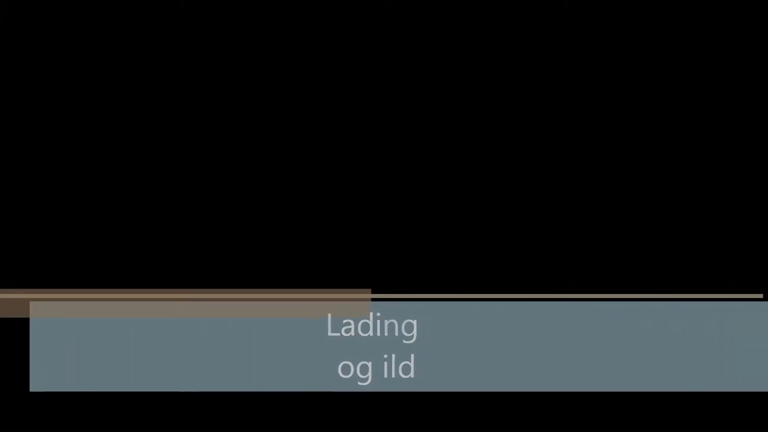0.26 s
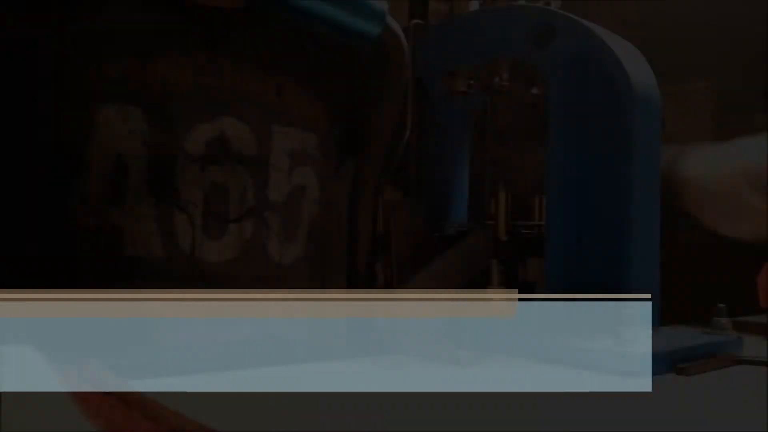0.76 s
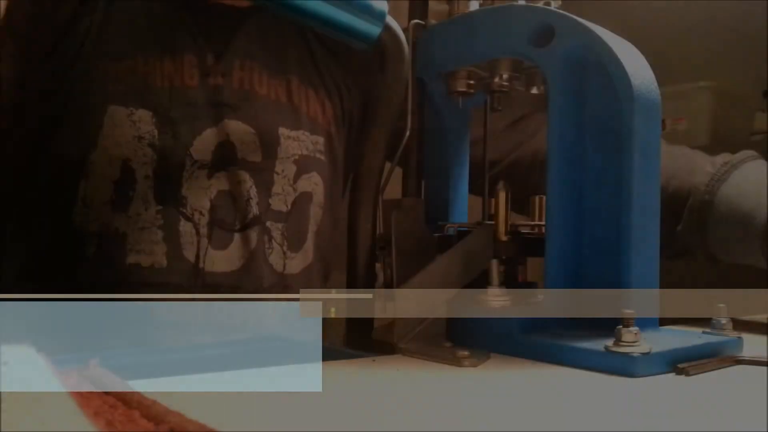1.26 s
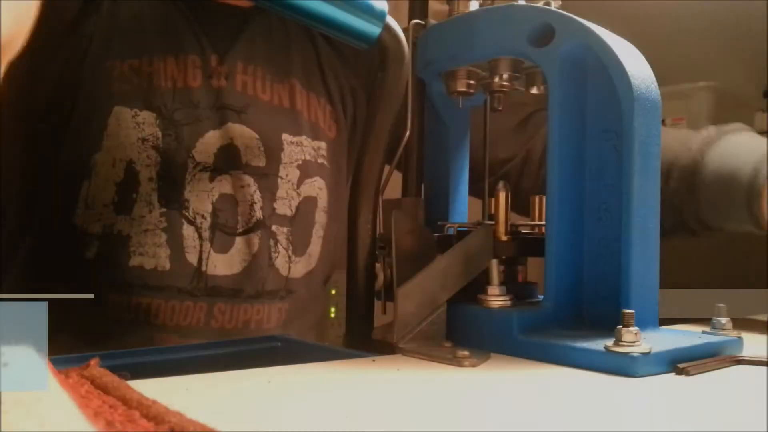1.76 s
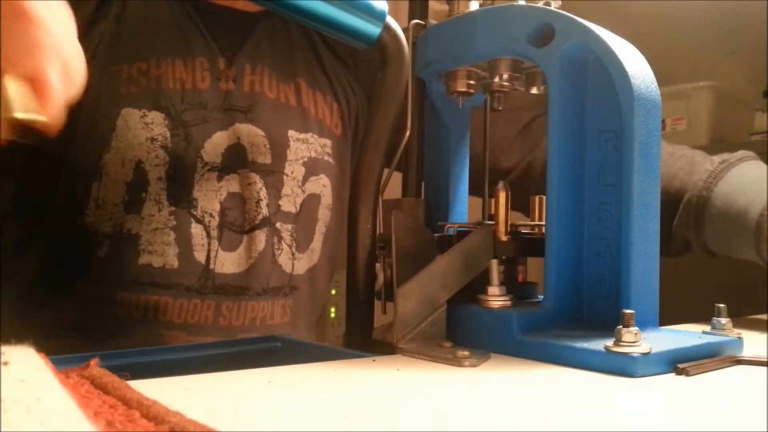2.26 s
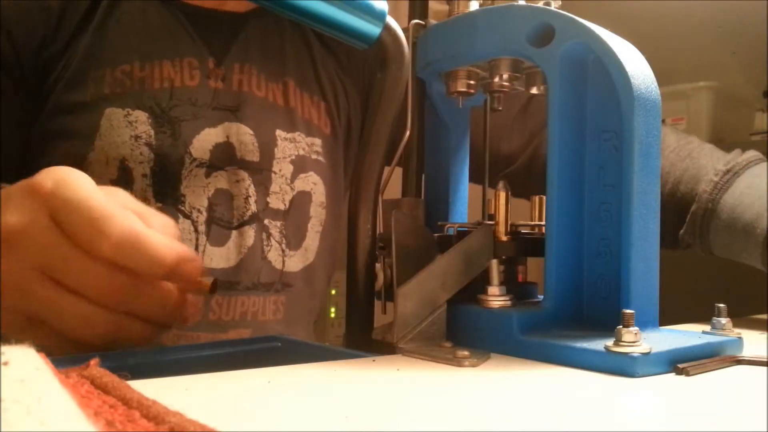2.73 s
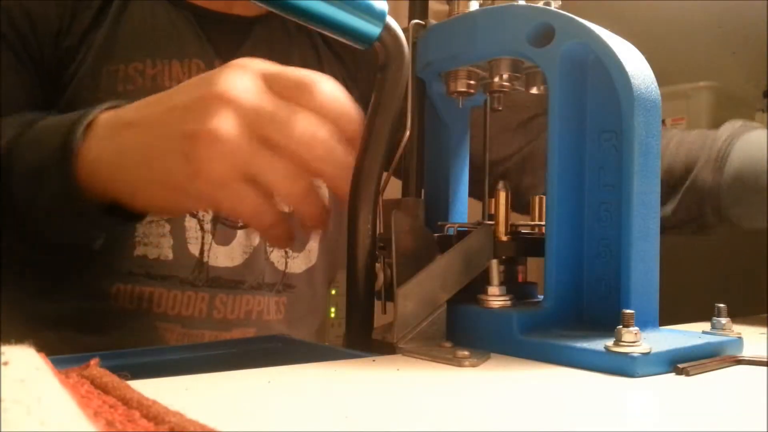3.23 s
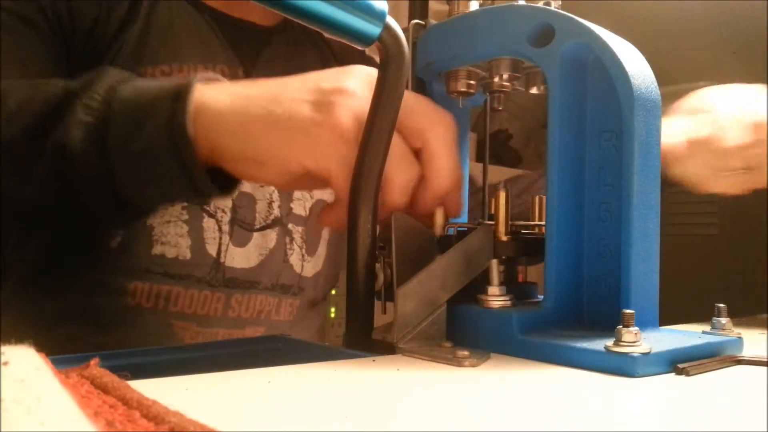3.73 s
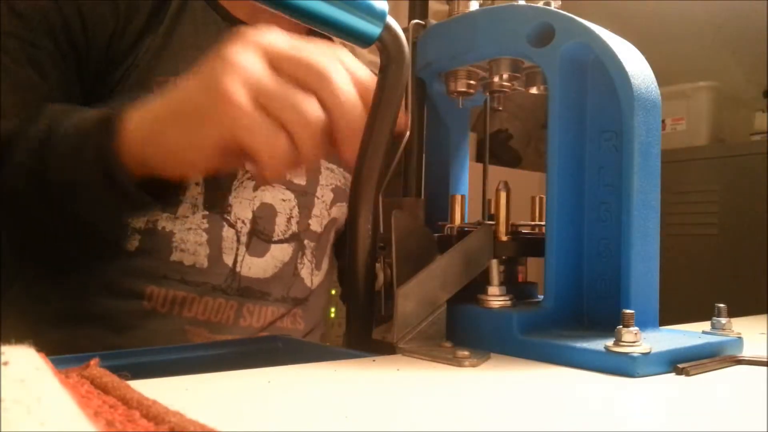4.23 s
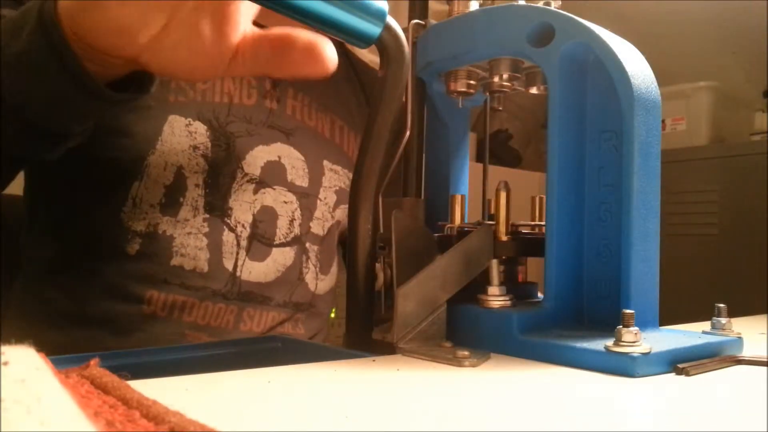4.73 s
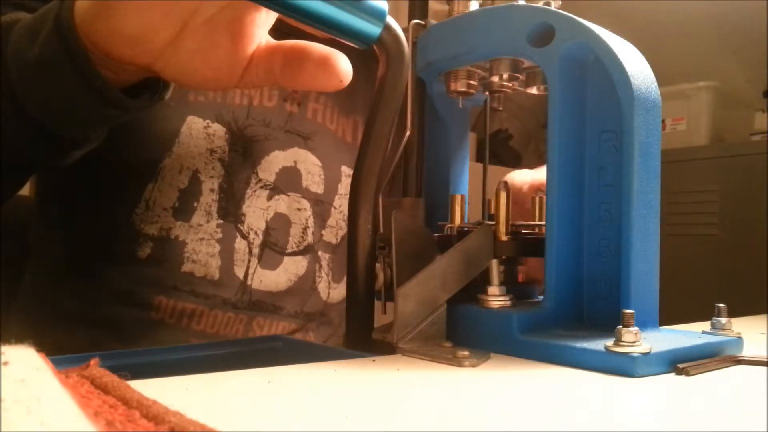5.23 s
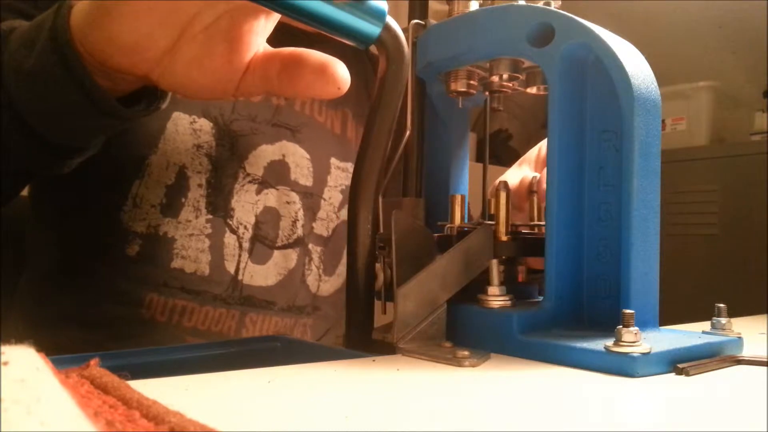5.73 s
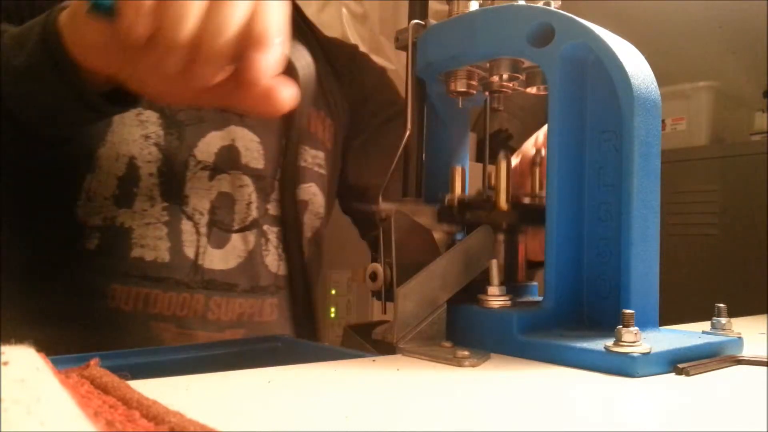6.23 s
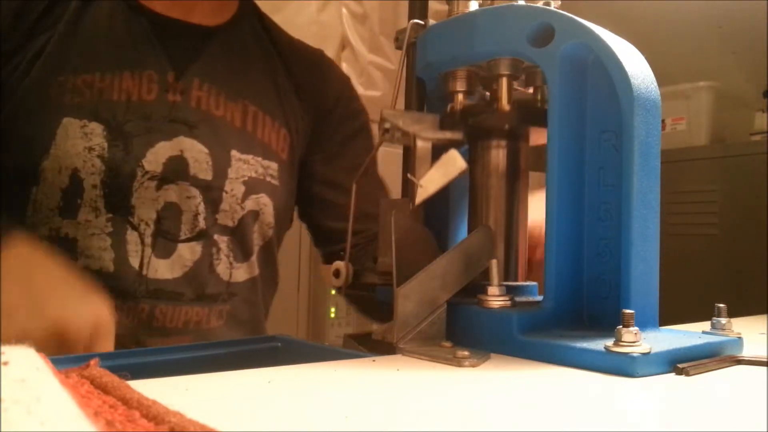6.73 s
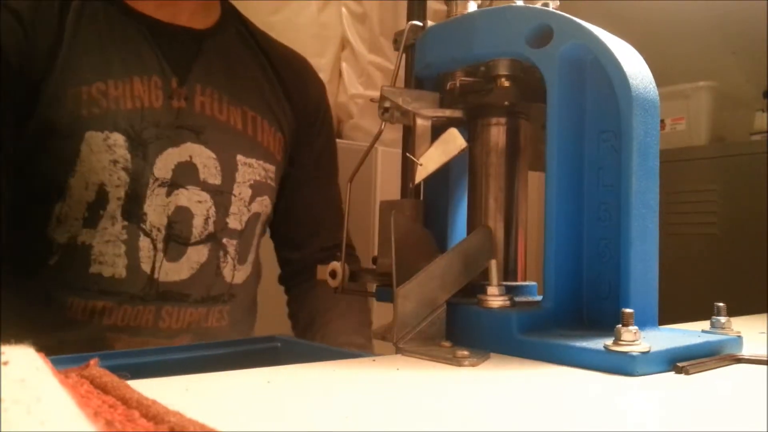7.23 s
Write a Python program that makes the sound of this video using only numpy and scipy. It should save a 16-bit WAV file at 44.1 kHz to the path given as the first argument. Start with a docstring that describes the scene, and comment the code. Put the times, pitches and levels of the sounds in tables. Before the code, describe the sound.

Close rummaging through small brass cases, a quieter spell of light clicks, then a quick run of loud steel clanks from a hand press.

```python
"""A reloading press on a wooden bench, close up in a small room, on a spaced pair of microphones.
A hand rummages through brass cases in a tray, sets one on the shell plate, then pulls the handle and
the steel linkage clanks. Each contact rings the metal with a noisy crack; cases jostle and scrape, the
tray thumps and the bench creaks. Mains hum and microphone hiss lie under it; the loudest blows clip."""
import sys
import numpy as np
from scipy import signal
from scipy.fft import rfft, irfft, next_fast_len
from scipy.io import wavfile
from scipy.ndimage import map_coordinates

SR = 44100
rng = np.random.default_rng(int(sys.argv[2]) if len(sys.argv) > 2 else 0)


def unload_wav(signal):
    """Save mono or channel-first audio to the path in sys.argv[1] as 16-bit WAV at rate SR, clipped to [-1, 1]."""
    wavfile.write(
        sys.argv[1],
        SR,
        np.round(np.clip(np.atleast_2d(signal).T, -1, 1) * 32767).astype(np.int16),
    )


N = 330088

# Noise colour of brass cases. Each row: frequency in Hz, spectral level in dB.
BRASS_COLOUR = [(35, -62), (60, 9), (192, -30), (236, -15), (359, -9), (433, -5), (673, -8), (829, -5.5),
                (1480, -4.5), (3580, -8.5), (5710, -24), (12600, -34), (15500, -48.5)]


def press_clanks():
    """The linkage knocks as the handle is pulled, ringing the steel frame."""
    # Linkage blows, with rows as in contacts().
    blows = [(4.739, -24.5, 970, -31, 3040, -16.5, 10900, 0.0064),
             (4.784, -21.5, 901, -26.5, 2640, -18.5, 10900, 0.0067),
             (5.27, -40.5, 856, -42, 2790, -21, 8650, 0.0061),
             (5.37, -46, 560, -37, 1850, -8, 7380, 0.0054), (5.578, -39, 855, -41, 2940, -10, 7980, 0.0067),
             (5.766, -38, 506, -53, 2380, -21, 6840, 0.0044),
             (5.99, -40.5, 533, -46, 2220, -22, 8720, 0.0056),
             (6.049, -36, 585, -42.5, 2700, -14.5, 7120, 0.0043),
             (6.098, -32, 470, -47, 3500, -23, 8620, 0.0074),
             (6.158, -37, 520, -47.5, 3140, -16, 6790, 0.0044),
             (6.319, -27.5, 529, -29, 2985, -10.5, 13400, 0.0047),
             (6.452, -41, 890, -36.5, 4230, -17, 13500, 0.0044),
             (6.475, -27, 583, -36, 2410, -31, 7250, 0.0034),
             (6.491, -32.5, 354, -35, 1990, -33, 8380, 0.0058),
             (6.651, -26.5, 482, -30, 1990, -6, 8060, 0.0044),
             (6.669, -13.5, 470, -15.5, 2070, -12, 8040, 0.0058),
             (6.684, -3, 607, -12, 1720, -35, 6540, 0.0032), (6.693, -3, 530, -5, 1700, -30, 6770, 0.0034),
             (6.778, -9, 543, -11.5, 3430, -9.5, 8400, 0.004),
             (6.838, -15.5, 476, -22, 1990, -3, 8400, 0.0041),
             (6.862, -9, 254, -19.5, 2910, -10.5, 8100, 0.0043),
             (6.9, 0, 496, -16, 1960, -21.5, 8220, 0.0045),
             (6.946, -5.5, 515, -38, 1724, -33, 6810, 0.0034),
             (6.974, -20, 497, -23.5, 3820, -4.5, 14000, 0.0079),
             (7.015, -9.5, 563, -21.5, 1770, -17.5, 9900, 0.0048),
             (7.053, -34, 500, -37, 4360, 5, 13700, 0.0029),
             (7.09, -25.5, 354, -36, 4300, -5.5, 13400, 0.0026),
             (7.102, -18, 357, -29.5, 3810, -27, 6610, 0.005),
             (7.219, -4.5, 474, -12, 2130, -36, 6340, 0.0025),
             (7.231, -9, 531, -11, 1780, -13.5, 7400, 0.0071),
             (7.244, -26, 433, -11, 1810, -3, 6500, 0.006),
             (7.261, -19, 323, -13, 2000, -6.5, 6930, 0.0035),
             (7.298, -14, 545, -30, 2480, -28, 6940, 0.0034),
             (7.316, -25, 545, -34, 2100, -28, 7070, 0.0055),
             (7.429, -24.5, 254, -43.5, 2520, -33, 6910, 0.0028)]
    # Modes of the frame and noise colour of the steel. Each row: frequency in Hz, level in dB.
    frame_modes = [(240, -4), (355, -15), (518, -12.5), (600, 1), (930, -7), (1800, 41), (2400, -9),
                   (3110, -38), (3565, -6), (4720, 13)]
    steel_colour = [(35, -56), (60, -8), (183, -22.5), (231, -15), (376, -13), (509, 9), (657, -3.5),
                    (953, -4.5), (1350, -16), (1830, -19.5), (2710, -31.5), (13800, -40.5), (15500, -40)]
    return contacts(blows, frame_modes, steel_colour, lead_s=0.00038, shake_db=-6, bass_hz=94, pan_db=-1)


def case_clinks():
    """Brass cases knock against each other and the tray."""
    # Case hits, with rows as in contacts().
    hits = [(0.562, -23, 603, -27.5, 2400, -15, 13000, 0.0021),
            (0.824, -40, 443, -44, 1620, -26, 10200, 0.0048),
            (0.918, -18.5, 754, -31.5, 2570, -20, 6060, 0.0037),
            (0.943, -21.5, 550, -42, 2120, -27, 8720, 0.0053),
            (0.993, -20, 730, -33, 2250, -27, 6400, 0.005),
            (1.017, -20.5, 423, -29.5, 3450, -15.5, 9370, 0.0049),
            (1.08, -7, 549, -20.5, 2130, -28, 6870, 0.004),
            (1.101, -4, 479, -11.5, 3210, -18, 7460, 0.0029),
            (1.12, -4.5, 552, -16, 2220, -26, 6150, 0.0067),
            (1.138, -10, 1110, -18, 2180, -29, 8210, 0.0075),
            (1.148, -0.5, 611, -11, 1640, -31, 7830, 0.0034),
            (1.172, -9.5, 556, -13, 1946, -20, 6840, 0.0076),
            (1.188, -6.5, 1007, -6.5, 1950, -15, 7290, 0.0025),
            (1.218, -12, 1150, -14, 1660, -15, 6440, 0.0046), (1.25, -7, 584, -15, 1570, -23, 5960, 0.004),
            (1.287, -14.5, 530, -22, 1680, -25, 6280, 0.0098),
            (1.345, -9, 783, -21, 1820, -23, 6820, 0.008), (1.367, -9, 520, -13.5, 1640, -22, 6330, 0.0033),
            (1.38, -13.5, 610, -19.5, 1795, -16.5, 5900, 0.0072),
            (1.419, -18.5, 674, -21, 1700, -13, 6700, 0.0048),
            (1.603, -9, 596, -11.5, 1980, -20.5, 7800, 0.0028),
            (1.682, -12, 527, -16.5, 2730, -20, 7600, 0.0017),
            (1.782, -8, 977, -13.5, 2440, -15, 7920, 0.0044),
            (1.806, -8.5, 553, -16.5, 2430, -18, 7100, 0.0043),
            (1.845, -5, 870, -8.5, 2430, -15, 5940, 0.0034),
            (1.871, -6.5, 910, -16, 3250, -10.5, 5860, 0.0039),
            (1.905, -13.5, 835, -20, 1660, -22, 6930, 0.0047),
            (1.96, -4, 800, -12, 2550, -18, 7030, 0.0027), (1.993, -12, 803, -23, 3600, -23, 6090, 0.0047),
            (2.017, -7.5, 772, -18.5, 3210, -20.5, 7780, 0.0035),
            (2.104, -2.5, 790, -7.5, 1710, -18, 7320, 0.0028),
            (2.143, -12.5, 770, -21.5, 3630, -19, 8200, 0.0045),
            (2.208, -0.5, 794, -11.5, 3090, -23.5, 6640, 0.0046),
            (2.226, -6, 715, -17.5, 3150, -31, 6690, 0.004),
            (2.266, -10, 1240, -19, 2420, -19, 5890, 0.0077),
            (2.284, -7, 1175, -12, 3490, -13, 6170, 0.0034),
            (2.357, -9.5, 462, -12.5, 2230, -22, 5940, 0.0038),
            (2.376, -10.5, 552, -37, 2130, -32, 6630, 0.006),
            (2.411, -18.5, 774, -25.5, 1890, -31, 7180, 0.0078),
            (2.435, -15.5, 500, -24, 2500, -18, 7930, 0.0049),
            (2.513, -9, 545, -17, 2260, -21, 7700, 0.0064),
            (2.524, -11, 433, -15.5, 1820, -19, 6710, 0.012),
            (2.564, -12.5, 1170, -17.5, 3290, -22, 7200, 0.0027),
            (2.59, -13, 515, -22.5, 1900, -12.5, 5800, 0.0029),
            (2.658, -19, 933, -24.5, 1550, -17, 8100, 0.012),
            (2.674, -8, 890, -14, 1710, -21.5, 6000, 0.0036),
            (2.689, -13.5, 519, -15, 1600, -13, 8000, 0.0039),
            (2.832, -15.5, 810, -19, 2460, -11.5, 7400, 0.0037),
            (2.927, -9.5, 476, -19.5, 3140, -18, 7800, 0.0032),
            (2.946, -4.5, 880, -18.5, 3270, -29, 5840, 0.0023),
            (2.978, -1, 434, -40, 1870, -40, 6260, 0.0023), (3.029, -1, 540, -34, 1650, -37, 6430, 0.0016),
            (3.041, -11, 476, -28, 3040, -33, 5920, 0.0043),
            (3.131, -2.5, 827, -15, 2240, -18, 5760, 0.0037),
            (3.198, -17.5, 560, -17, 1570, -13.5, 8370, 0.0048),
            (3.231, -22, 560, -26.5, 2250, -11.5, 10460, 0.0045),
            (3.285, -3, 867, -9, 1560, -12.5, 6700, 0.0048),
            (3.308, -18, 931, -16, 1580, -27, 8030, 0.0036), (3.323, -19, 890, -17, 2390, -22, 6500, 0.005),
            (3.343, -20, 960, -28, 1670, -29, 7580, 0.0058),
            (3.585, -25, 730, -21.5, 3600, 3, 9860, 0.0019),
            (3.691, -39.5, 610, -32.5, 2300, 3, 5900, 0.0037),
            (3.824, -20, 517, -17.5, 3000, 2.5, 5800, 0.006),
            (3.881, -29, 510, -33, 2860, -13, 5920, 0.0049),
            (4.051, -43, 619, -42, 2930, -1.5, 5870, 0.0059),
            (4.317, -38.5, 470, -43.5, 3700, -18, 8200, 0.0045)]
    # Modes of the tray and cases. Each row: frequency in Hz, level in dB.
    tray_modes = [(245, -10), (440, -7.5), (535, -1.5), (620, -5), (850, 6), (1015, -16), (1135, 7.5),
                  (1650, -25), (1950, -21), (2390, -6), (3020, -41), (3240, -2), (3500, -4), (4010, 2),
                  (4330, -23.5)]
    return contacts(hits, tray_modes, BRASS_COLOUR, lead_s=0.00028, shake_db=-12, bass_hz=186, pan_db=3.5)


def contacts(hits, modes, colour, lead_s, shake_db, bass_hz, pan_db):
    """Each hit rings every part with a noisy crack and reaches the left microphone first.
    Each row: start in seconds, knock level in dB and pitch in Hz, ping level in dB and pitch in Hz,
    tick level in dB against the knock and pitch in Hz, contact time in seconds."""
    # Parts that answer a hit. Each row: low and high edge in Hz, t60 in seconds, tonal share from 0 to 1.
    parts = [(98.5, 310, 0.056, 0.02), (179.6, 800, 0.046, 0.4), (660, 1646, 0.029, 0.47),
             (1545, 2500, 0.011, 0.13), (2650, 4700, 0.026, 0.13), (4830, 37000, 0.026, 0.05)]
    line_width, hold_cycles = 0.013, 1.14  # loose parts blur in pitch; low ones swing longer
    falloff_db_per_octave = 11  # a part answers less, the further it lies from the struck tone
    out, t = np.zeros((2, N + SR)), np.arange(SR // 10) / SR
    mode_hz, mode_db = np.transpose(modes)
    cracks = [band(rng.standard_normal(2 * SR), colour, lo, hi) for lo, hi, _, _ in parts]
    centre_hz = np.array([np.sqrt(lo * hi) for lo, hi, _, _ in parts])
    half_lead = round(lead_s * SR) // 2
    for start, knock_db, knock_hz, ping_db, ping_hz, tick_db, tick_hz, contact_s in hits:
        at, offsets, sound = round(start * SR), rng.integers(SR, size=2), 0
        pitch = mode_hz * np.exp(0.0405 * rng.standard_normal(len(modes)))  # never quite the same spot
        pitch = np.append(pitch, [knock_hz, ping_hz, tick_hz])
        strength = amp(np.append(mode_db + 2 * rng.standard_normal(len(modes)), [11, 7, 0]))
        polarity = np.append(rng.choice([-1, 1], len(modes)), [1, 1, 1])
        walk = np.cumsum(rng.standard_normal((len(pitch), len(t))), axis=1)
        drift = np.sqrt(2 * np.pi * line_width * pitch[:, None] / SR) * walk
        tones = (strength * polarity)[:, None] * np.sin(2 * np.pi * pitch[:, None] * t + drift)
        low_db = knock_db - falloff_db_per_octave * abs(np.log2(centre_hz[1:3] / knock_hz))
        high_db = ping_db - falloff_db_per_octave * abs(np.log2(centre_hz[3:5] / ping_hz))
        levels = [shake_db + low_db[0], *low_db, *high_db, knock_db + tick_db]  # first: the bench shakes
        lean_db = pan_db + 3 * rng.standard_normal()
        for (lo, hi, t60, tonal), level_db, crack in zip(parts, levels, cracks):
            ring = unit(tones[(pitch >= lo) & (pitch < hi)].sum(axis=0))
            beaming = lo / (lo + 500)  # short waves beam, so the sides differ more in the treble
            mid, side = (crack[i:i + len(t)] for i in offsets)
            noise = unit(mid + 1.16 * beaming * np.outer([1, -1], side))
            rise = 1 - np.exp(-t * lo)
            mix = np.sqrt(tonal) * ring + np.sqrt(1 - tonal) * rise * noise
            free_s = np.maximum(t - contact_s - hold_cycles / np.sqrt(lo * hi), 0)
            balance_db = beaming * lean_db * np.array([[0.5], [-0.5]])
            sound = sound + amp(level_db - 60 * free_s / t60 + balance_db) * mix
        out[0, at - half_lead:][:len(t)] += sound[0]
        out[1, at + half_lead:][:len(t)] += sound[1]
    return filtered(out[:, :N], lambda f: (1j * f / (bass_hz + 1j * f)) ** 3)  # small parts: little bass


def jostle(lead_s, spread_db):
    """Shifting brass makes thousands of tiny touches a second, part direct and part scattered."""
    # Rummaging, setting up, the stroke: a list each. Each row: time in seconds, rumble and rustle in dB.
    gestures = [
        [(0.58, -103, -125), (0.73, -54, -57.5), (0.95, -41.5, -45.5), (1.16, -20.5, -22.5), (1.26, -19, -22),
         (1.42, -33.5, -41.5), (1.65, -34.5, -46.5), (1.99, -26, -28), (2.46, -26, -35), (2.78, -43.5, -54),
         (2.92, -43, -58), (3.14, -26.5, -48), (3.22, -39, -54), (3.38, -35, -49), (3.5, -52, -54)],
        [(3.56, -49, -62), (3.64, -48.5, -56), (3.77, -54, -42.5), (3.87, -37.5, -41.5), (4.1, -62, -53),
         (4.51, -56, -63), (4.77, -73, -92), (4.91, -45.5, -59), (5.06, -58.5, -93), (5.32, -53, -51),
         (5.46, -62, -57), (5.7, -63, -65), (5.99, -55, -60), (6.14, -52, -56), (6.55, -45.5, -52)],
        [(6.62, -47, -52), (6.714, -21.5, -38), (6.832, -26, -31), (6.864, -30, -28), (6.92, -23.5, -28.5),
         (7.032, -27.5, -33), (7.154, -50, -51), (7.284, -31, -29), (7.356, -39, -46.5), (7.48, -45, -57)],
    ]
    times, *levels = np.concatenate(gestures).T
    rumble, rustle = (amp(np.interp(np.arange(N) / SR, times, db, left=-120)) for db in levels)
    fizz = amp(-9) * rustle
    clumps, out = amp(2.5 * wobble(60)), 0
    layers = [(rumble, 180, 970, 2000), (rustle, 1500, 5400, 3000), (fizz, 5500, 34000, 6000)]
    for gain, lo_hz, hi_hz, touches_per_s in layers:
        touches = (rng.random((3, N)) < touches_per_s / SR) * rng.standard_normal((3, N)) * clumps
        out = out + gain * band(touches, BRASS_COLOUR, lo_hz, hi_hz)
    direct = np.array([amp(-9.5) * out[0], amp(-15.5) * np.roll(out[0], round(lead_s * SR))])
    return direct + amp(spread_db) * diffuse(out[1:])


def bench_thumps():
    """The tray drops on the bench top and the wood booms."""
    # Each row: start in seconds, level in dB.
    drops = [(2.319, -40), (2.428, -25), (2.513, -41), (2.834, -45), (2.93, -33), (2.983, -24),
             (3.031, -19.5), (3.287, -43)]
    # Each row: frequency in Hz, level in dB, t60 in seconds.
    bench_modes = [(141.8, -32, 0.3), (252.6, -4, 0.15)]
    return struck(drops, bench_modes, rise_s=0.0088)


def case_tinks():
    """A single case is touched and rings free."""
    # Each row: start in seconds, level in dB.
    touches = [(4.0532, -34), (6.319, -27.5)]
    # Each row: frequency in Hz, level in dB, t60 in seconds.
    case_modes = [(3160, 5, 0.045), (5200, -6, 0.037), (11000, -10.5, 0.06), (13420, -11.5, .06)]
    return struck(touches, case_modes, rise_s=0.0002)


def struck(hits, modes, rise_s):
    """A few modes ring down after each hit, in a slightly new balance each time."""
    out, t = np.zeros(N), np.arange(SR // 4) / SR
    for start, db in hits:
        ring = sum(amp(level + rng.normal(0, 1.5) - 60 * t / t60) * np.sin(2 * np.pi * hz * t)
                   for hz, level, t60 in modes)
        out[round(start * SR):][:len(t)] += amp(db) * (1 - np.exp(-t / rise_s)) * ring
    return out


def scrapes():
    """A case, the shell plate or the ram slides: a band of rubbing noise swells and fades."""
    # Each row: start, peak and end in seconds, centre in Hz, half width in octaves, level in dB.
    strokes = [(0.558, 0.577, .74, 1280, 1.63, -37), (3.781, 3.83, 3.92, 11500, 0.62, -30),
               (3.785, 3.802, 3.85, 3830, 0.66, -30.5), (3.8, 3.856, 4.08, 4900, 0.23, -40.5),
               (4.8, 4.894, 5.15, 1400, 0.27, -50), (5.25, 5.276, 5.38, 2930, .4, -49),
               (5.378, 5.443, 5.54, 4200, .4, -54), (6.447, 6.454, 6.52, 3900, 0.2, -38),
               (6.764, 6.8, 7.06, 4540, .6, -30.5), (6.76, 6.89, 7.17, 11200, 0.79, -34),
               (7.08, 7.097, 7.16, 4000, 0.23, -34)]
    out = np.zeros((2, N))
    for start, peak, end, hz, octaves, db in strokes:
        span = np.arange(round(start * SR), round(end * SR))
        noise = rng.standard_normal((2, SR // 2))
        rub = filtered(noise, lambda f: np.exp(-(np.log2((f + 1) / hz) / octaves) ** 2))
        swell = np.interp(span / SR, [start, peak, end], [0, 1, 0]) ** 2
        out[:, span] += amp(db) * swell * unit(rub)[:, :len(span)]
    return diffuse(out * amp(2 * wobble(62)))


def creaks():
    """Weight shifts on the bench and lever; stick and slip at a wavering rate gives a faint groan."""
    # Each row: start, peak and end in seconds, first and last pitch in Hz, level in dB.
    groans = [(0.724, 0.835, 0.93, 232.8, 217, -43.5), (4.857, 4.964, 5.15, 302, 285, -48),
              (5.875, 6.016, 6.7, 276, 267, -52.5), (6.047, 6.133, 6.3, 332.4, 451, -49),
              (6.184, 6.23, 6.1, 1690, 1650, -52)]
    # Each row: multiple of the pitch, level in dB.
    harmonics = [(1, -5.5), (2, 0), (3, -7), (4, -25), (5, -13), (7, -18)]
    out, waver = np.zeros(N), wobble(60)
    for start, peak, end, first_hz, last_hz, db in groans:
        span = np.arange(round(start * SR), round(end * SR))
        slip_hz = np.linspace(first_hz, last_hz, len(span)) * (1 + 0.0171 * waver[span])
        cycles = np.cumsum(slip_hz) / SR
        tone = sum(amp(level) * np.sin(2 * np.pi * k * cycles) for k, level in harmonics)
        swell = np.interp(span / SR, [start, peak, end], [0, 1, 0])
        out[span] += amp(db + 2 * waver[span[::-1]]) * swell * tone
    return out


def room(x):
    """The small room's short tail; hands and objects move, so the echo pattern keeps changing."""
    # Each row: frequency in Hz, t60 in seconds.
    decay_times = [(150, 0.47), (400, 0.17), (1000, 0.21), (2800, 0.22), (7000, 0.32)]
    out, step, delay_samples = np.zeros((2, N + 2 * SR)), SR // 5, 130
    for at in range(0, N, step):
        hz, t, noise = signal.stft(rng.standard_normal((2, SR // 3)), SR, nperseg=256)
        decay = amp(-60 * t / along(decay_times, hz)[:, None])
        tail = signal.istft(noise * decay, SR, nperseg=256)[1]
        wet = signal.fftconvolve(x[None, at:at + step], tail / np.linalg.norm(tail[0]), axes=1)
        out[:, at + delay_samples:][:, :wet.shape[1]] += wet
    return diffuse(out[:, :N])


def room_tone(noise_db, hum_hz, hum_db):
    """Steady room air and microphone hiss, with mains hum."""
    # Each row: frequency in Hz, spectral level in dB.
    air_colour = [(20, -30), (45, -12), (75, -18), (130, 0.5), (280, -4.5), (600, -1.5), (1000, -6.5),
                  (1550, -15), (3900, -17), (6200, -25.5), (7700, -22.5), (13900, -21.5), (15500, -63)]
    noise = unit(filtered(rng.standard_normal((2, N)), lambda f: amp(along(air_colour, f))))
    hum = amp(hum_db) * np.sqrt(2) * np.sin(2 * np.pi * hum_hz * np.arange(N) / SR)
    return amp(noise_db + 0.3 * wobble(1.08)) * diffuse(noise) + hum


def diffuse(x):
    """Scattered sound at the spaced pair: two unrelated signals become alike, mainly in the bass."""
    # Each row: frequency in Hz, left-right correlation.
    likeness = [(60, 0.65), (180, 0.85), (550, 0.6), (1650, -0.21), (4970, 0.23), (15000, 0.15)]
    angle = lambda hz: np.arccos(along(likeness, hz)) / 2
    mid, side = filtered(x, lambda hz: np.array([np.cos(angle(hz)), np.sin(angle(hz))]))
    return np.array([mid + side, mid - side])


def amp(db):
    return 10 ** (np.asarray(db) / 20)


def unit(x):
    return x / np.sqrt(np.mean(x ** 2) + 1e-20)


def along(points, hz):
    """Interpolates (Hz, value) points on a log axis."""
    knots_hz, values = np.transpose(points)
    return np.interp(np.log(hz + 1), np.log(knots_hz + 1), values)


def wobble(rate):
    """A smooth random curve, rate knots a second."""
    return map_coordinates(rng.standard_normal(int(N * rate / SR) + 4), [np.arange(N) * rate / SR])


def filtered(x, response):
    """x through a complex frequency response."""
    n = x.shape[-1]
    padded = next_fast_len(n + 8192, real=True)
    return irfft(rfft(x, padded) * response(np.fft.rfftfreq(padded, 1 / SR)), padded)[..., :n]


def band(x, colour, lo_hz, hi_hz):
    """x coloured between two soft edges, rms 1."""
    edges = lambda f: 1 / np.sqrt((1 + (lo_hz / (f + 1)) ** 8) * (1 + (f / hi_hz) ** 8))
    return unit(filtered(x, lambda f: amp(along(colour, f)) * edges(f)))


def scene():
    """The work on the bench up close, with the room behind it."""
    bench = case_clinks() + press_clanks() + bench_thumps() + creaks()
    tinks = case_tinks()
    reverb = amp(-1) * room(bench.mean(axis=0))
    handling = jostle(lead_s=0.0003, spread_db=-0.5) + scrapes()
    return bench + tinks + reverb + handling + room_tone(noise_db=-50, hum_hz=100, hum_db=-62.5)


def record(dry):
    """The recorder is silent until switched on, clips at full scale and cuts the top treble."""
    on_s, fade_s, rolloff_hz, top_hz = 0.5632, 0.0051, 14600, 15725
    switch_on = np.clip((np.arange(N) / SR - on_s) / fade_s, 0, 1)
    softened = filtered(dry, lambda hz: 1 / np.sqrt(1 + (hz / rolloff_hz) ** 60))
    clipped = np.clip(softened, -1, 1)
    return switch_on * filtered(clipped, lambda hz: hz < top_hz)


dry = scene()
out = record(dry)
unload_wav(out)
```